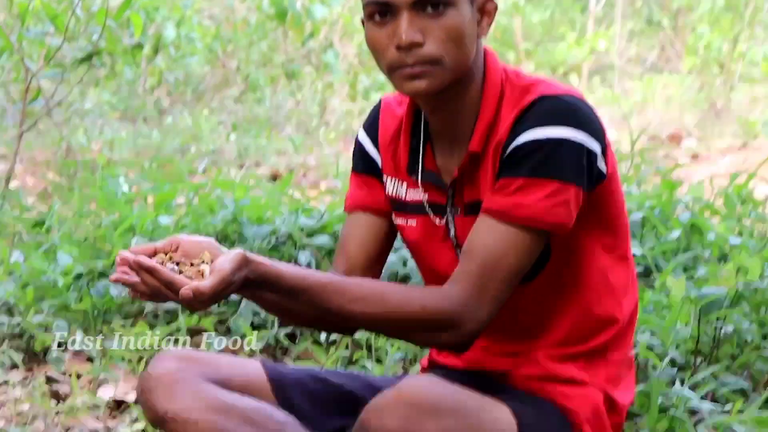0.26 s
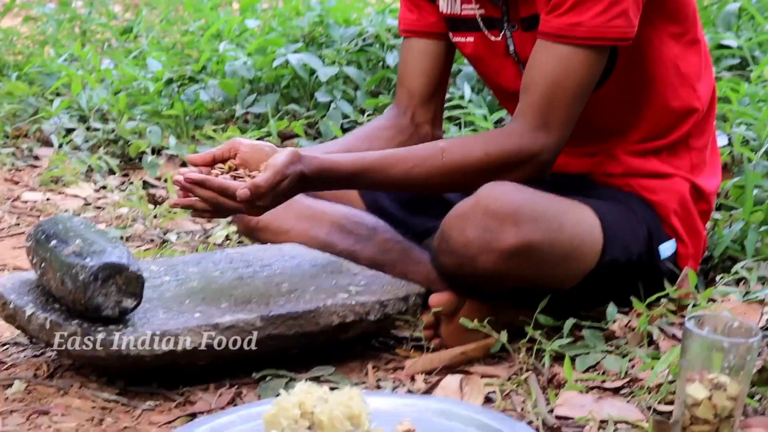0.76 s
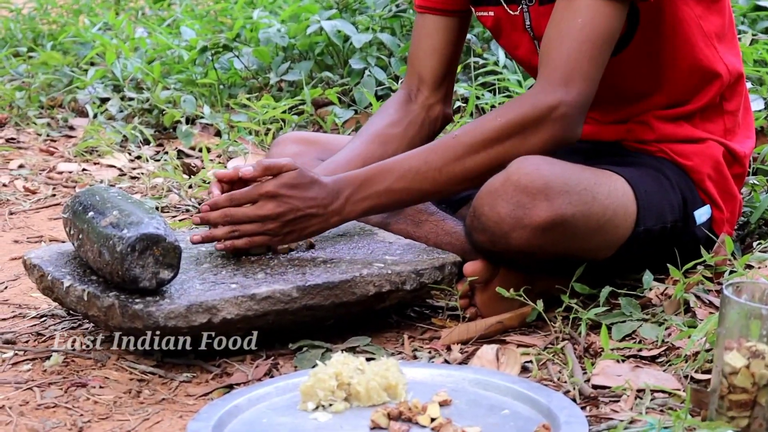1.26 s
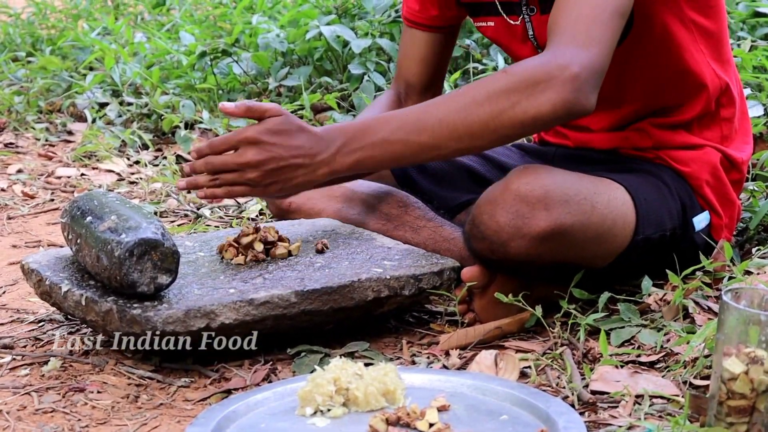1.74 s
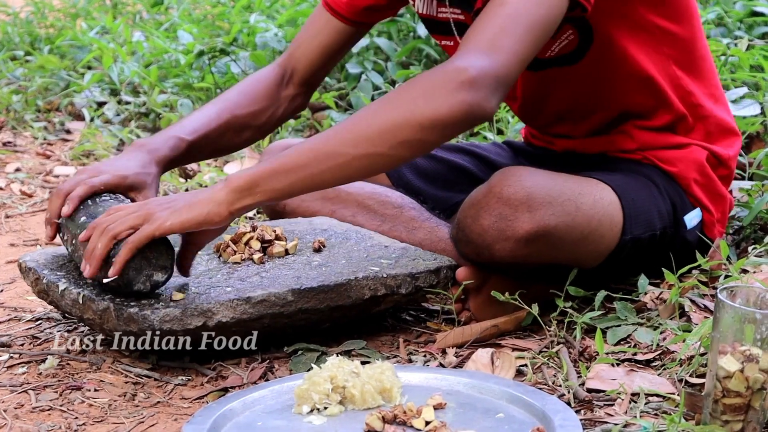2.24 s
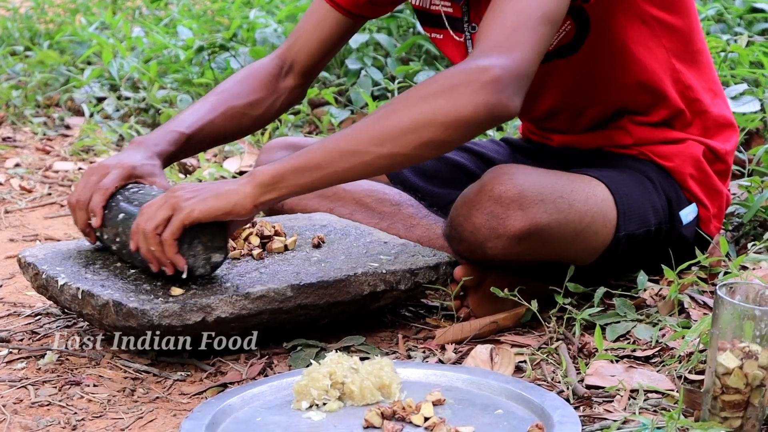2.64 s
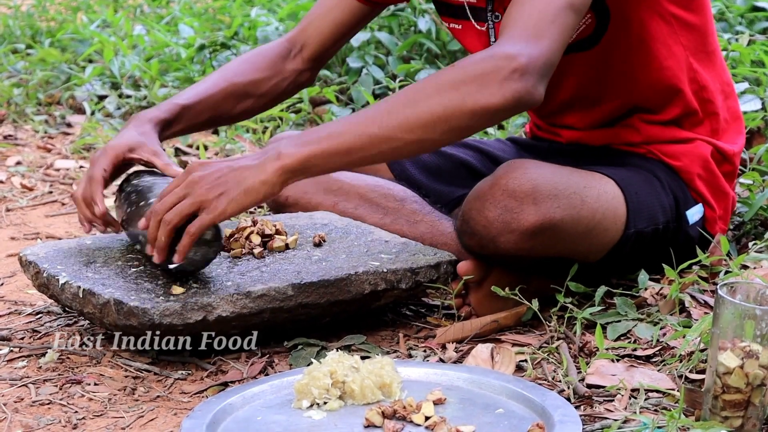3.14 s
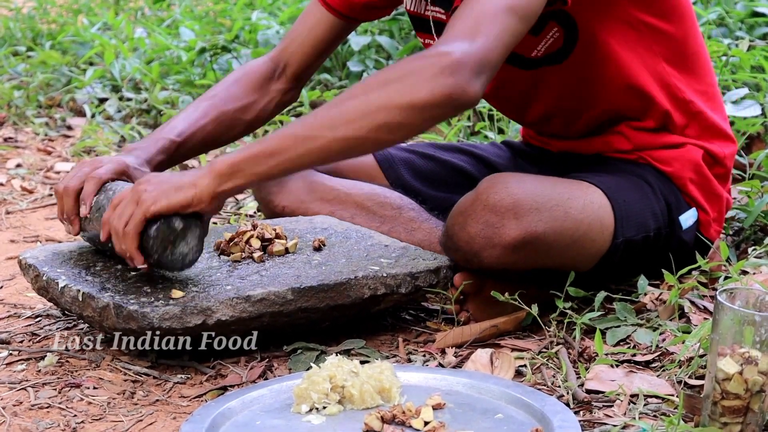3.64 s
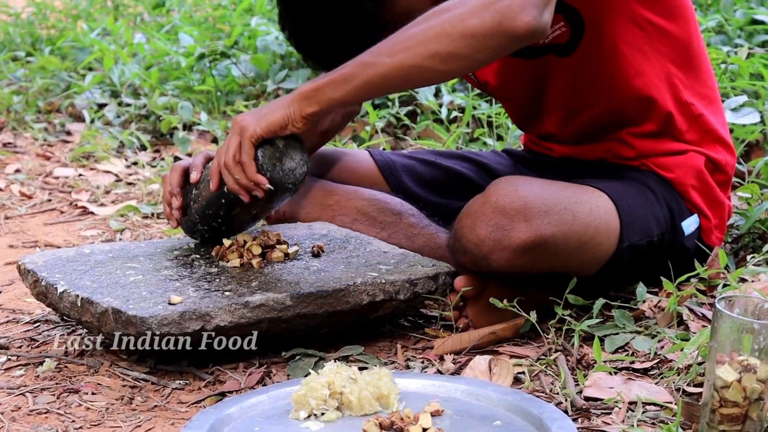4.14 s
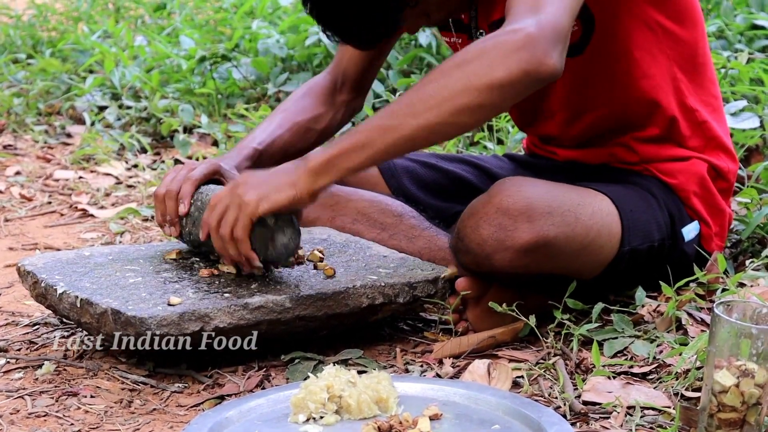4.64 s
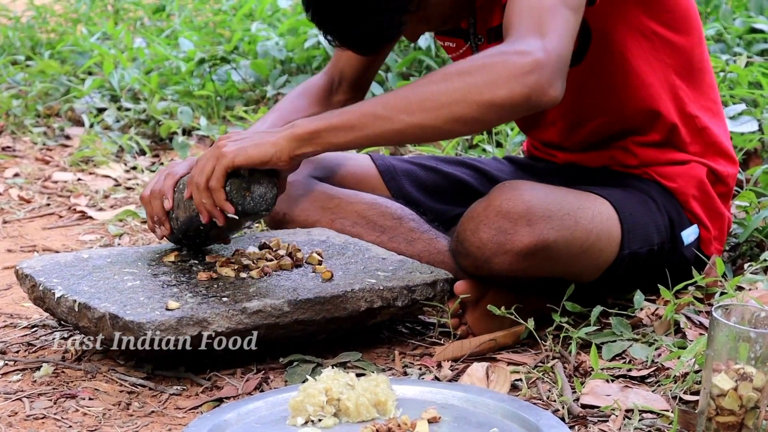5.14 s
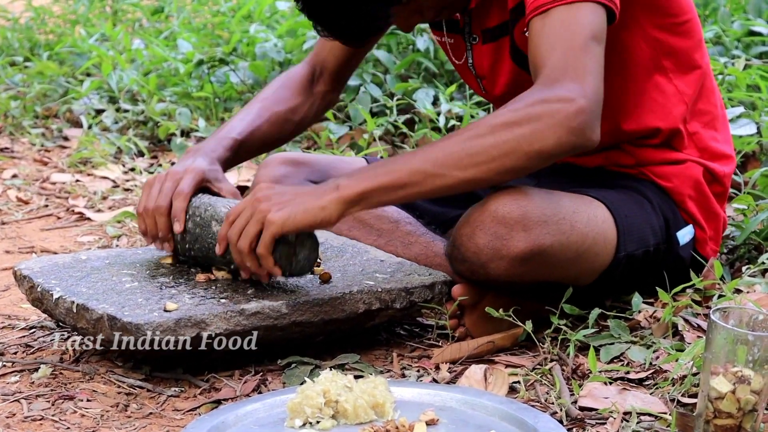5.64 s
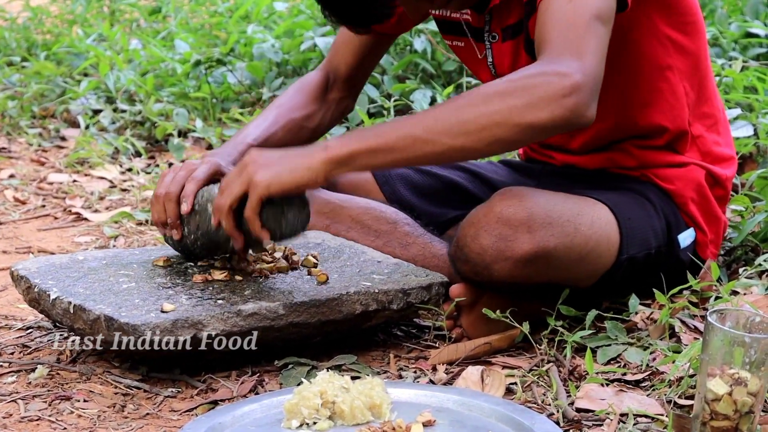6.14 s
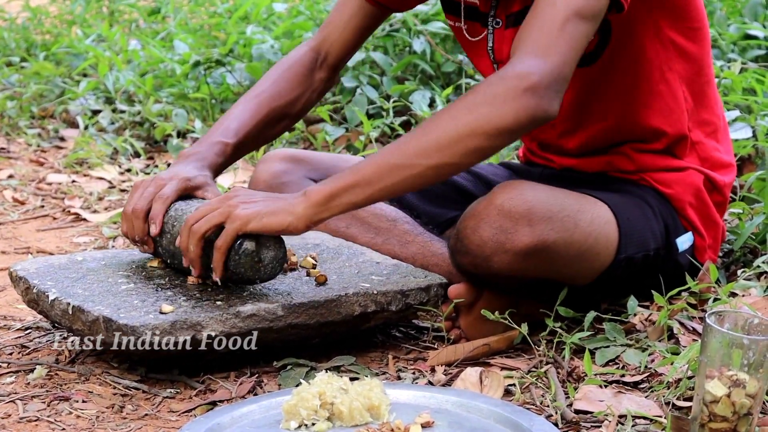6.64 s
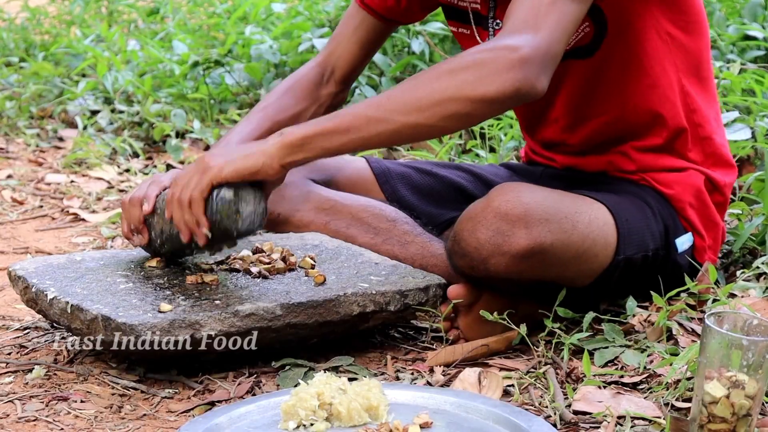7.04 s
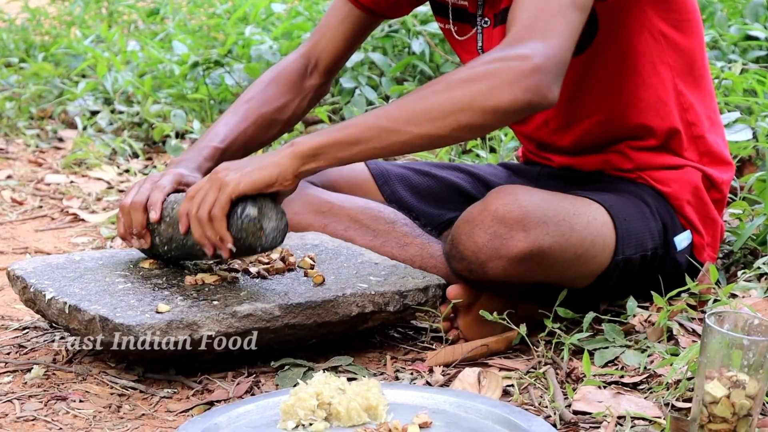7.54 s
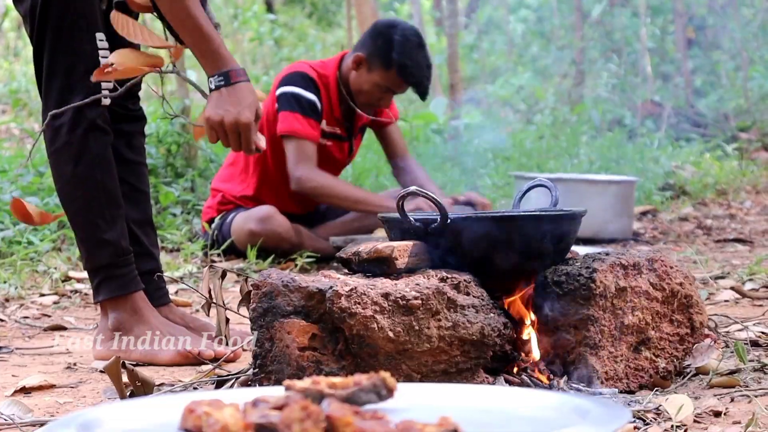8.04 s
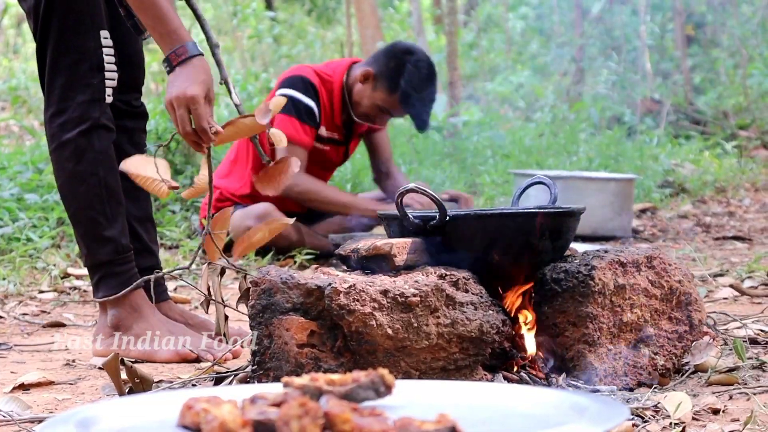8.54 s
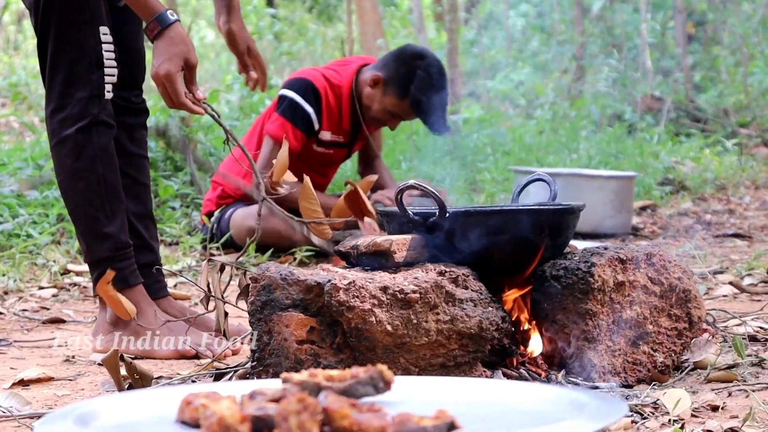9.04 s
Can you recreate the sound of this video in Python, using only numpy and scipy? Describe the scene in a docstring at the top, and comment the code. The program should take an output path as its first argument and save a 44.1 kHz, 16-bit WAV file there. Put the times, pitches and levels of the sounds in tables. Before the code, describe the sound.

Close to the microphone, dry seeds crackle softly before a stone pestle rumbles and rattles across a slab. Irregular blows follow, stone clacking on stone and crunching spices, with a slight echo from trees. High insects buzz all around throughout. The sound cuts out for a moment and returns beside a wood fire, with popping embers, dragged leaves and more distant hollow knocks.

```python
"""Outdoors, insects drone all round while seeds shift in the palms and dry husks snap.
From about 2.4 s a stone pestle rolls and chatters on a grinding slab. From 4 s it is knocked on dry spices:
each blow clacks, thuds into the ground, rings the pestle and echoes back from the trees.
Near 7.9 s the sound fades out briefly. It returns by a wood fire, where embers snap, a leafy branch
rustles and the pestle works farther off."""
import sys
import numpy as np
from scipy import signal
from scipy.fft import rfft, irfft, next_fast_len
from scipy.io import wavfile
from scipy.ndimage import uniform_filter1d, map_coordinates

SR = 44100
rng = np.random.default_rng(int(sys.argv[2]) if len(sys.argv) > 2 else 0)


def inscribe(sig):
    """Save sig as 16-bit PCM at rate SR to the path in sys.argv[1].

    A 1-D sig is mono; a 2-D sig holds one channel per row.
    Samples are clipped to [-1, 1] before scaling.
    """
    pcm = np.round(np.clip(np.atleast_2d(sig).T, -1, 1) * 32767)
    wavfile.write(sys.argv[1], SR, pcm.astype(np.int16))


N = 409248
FIRESIDE_S = 7.96  # when the sound returns by the fire


def pounding(clack_db=26, echo_db=-8, crush_db=4.5, spot_db=5, spot_octaves=0.13, pan_db=-1.5):
    """The pestle clacks, hops and crushes spice; the barer the stone, the more it rings."""
    # (time [s], clack level [dB], ring level [dB], top edge of the clack [Hz], tilt [dB per octave],
    #  resonance of the spot that is hit [Hz], hop delay [ms], hop level [dB])
    blows = [(4.046, -24.5, -28, 2330, -5, 1230, 13.7, -12),
             (4.521, -22.5, -22.5, 2630, 2, 1270, 11.3, -3.5), (4.836, -26.5, -45, 2140, 1, 1810, 9, -3),
             (5.1427, -21, -23.5, 2350, 3, 1810, 10.2, -5), (5.4539, -28.5, -53, 2250, 1.5, 1880, 5.8, -4),
             (5.774, -17.5, -19, 2870, 4, 1140, 5.5, -20), (5.7996, -23.5, -33, 2500, 5, 1090, 18, -5.5),
             (6.071, -15.5, -4.5, 3180, 7.5, 2780, 5.5, -16),
             (6.099, -24.5, -40, 2450, 3.5, 1900, 12.7, -2), (6.938, -30.5, -48, 2300, 2.5, 1360, 7, -3),
             (7.267, -19.5, -13, 2899, 4.5, 1350, 7.3, -10), (7.5544, -27, -27, 2710, 1.5, 1250, 19, -16),
             (7.853, -21.5, -13, 2790, 4.5, 1850, 10.6, -7), (9.185, -28.5, -30.5, 2460, 2, 1110, 8.7, -5)]
    # tone of stone on stone, and of the ground below: (frequency [Hz], level [dB])
    clack_tone = [(25, -54), (150, -8.5), (350, -6), (600, -2), (900, 2), (1200, 1), (1500, 0),
                  (1800, -0.5), (2400, -1)]
    thud_tone = [(20, -48), (40, -22), (90, -3), (150, 4.5), (260, -0.5), (500, -30.5), (1500, -81)]
    out = np.zeros((2, N))
    thud = impulse(lambda hz: along(thud_tone, hz))
    for s, hit_db, ring_db, edge_hz, tilt, spot_hz, hop_ms, hop_db in blows:
        spot = lambda hz: resonance(hz, spot_hz, spot_db, spot_octaves)
        cushion = lambda hz: tilt * np.log2((hz + 200) / 1500) - 10 * np.log10(1 + (hz / edge_hz) ** 22)
        click = impulse(lambda hz: along(clack_tone, hz) + spot(hz) + cushion(hz))
        paths = amp(echo_db) * tree_echo(width=0.36, rise_s=0.016)
        paths[:, 0] += 1  # the direct sound
        paths[:, round(0.0016 * SR)] += 0.35  # the clack bounces back off the ground
        paths[:, round(hop_ms * SR / 1000)] += amp(hop_db)  # the pestle hops once
        # a harder blow raises the thud and the crunch less than the clack
        contact = amp(hit_db + clack_db) * click * panned(pan_db) + amp(0.37 * hit_db) * thud
        crunch = amp(0.42 * hit_db + crush_db) * signal.fftconvolve(rattle(rate=400, t60=0.046), click)
        ring = panned(-3.5) * pestle_ring(hit_db, ring_db)
        ring_echo = signal.fftconvolve(tree_echo(width=0.62, rise_s=0.056), ring, axes=1)
        blow = np.zeros((2, N))
        add(blow, s, signal.fftconvolve(paths, contact, axes=1))
        add(blow, s, crunch * panned(pan_db))
        add(blow, s, ring)
        add(blow, s + 0.08, amp(-20) * ring_echo)
        if s < FIRESIDE_S:  # nothing rings on across the silence
            blow[:, round(FIRESIDE_S * SR):] = 0
        out += blow
    return out


def pestle_ring(hit_db, ring_db, main_hz=2752, main_t60=0.18, grip_hz=7, vary_db=3, lead_rad=0.77):
    """The struck pestle bends and rings: one main note that shifts with the grip, and three others."""
    # the other notes: (frequency [Hz], relative level [dB], time to fade by 60 dB [s])
    other_notes = [(1783, -13.5, 0.062), (2352, -8.5, 0.18), (4480, -19, 0.079)]
    t = np.arange(SR // 2) / SR
    phase = np.array([[lead_rad / 2], [-lead_rad / 2]])  # left runs ahead of right
    notes = [(hz, db + (hit_db + ring_db) / 2 + vary_db * rng.normal(), t60)
             for hz, db, t60 in other_notes]
    notes.append((main_hz + grip_hz * rng.normal(), ring_db, main_t60))
    attack = 1 - np.exp(-t / 0.00028)
    return attack * sum(amp(db - 60 * t / t60) * np.sin(2 * np.pi * hz * t + phase)
                        for hz, db, t60 in notes)


def nudging(level_db=27, echo_db=-8):
    """Tipped or nudged, the pestle chatters as it settles: the slab knocks hollowly, with no ring."""
    # (time [s], relative level [dB], top edge of the knock [Hz])
    nudges = [(2.396, -33, 774), (2.633, -36, 890), (2.642, -36, 785), (2.676, -31.5, 800),
              (2.683, -31, 800), (2.697, -30.5, 1000), (2.735, -36, 1000), (2.751, -29, 1050),
              (2.783, -37, 950), (2.809, -42, 905), (2.825, -40, 650), (2.842, -37.5, 700),
              (2.88, -43, 600), (2.908, -39, 650), (2.939, -40.5, 650), (2.99, -40, 545),
              (3.213, -39.5, 550), (3.246, -36, 490), (3.319, -34.5, 650), (3.696, -40.5, 646),
              (3.782, -34.5, 970), (3.87, -37.5, 1020), (4.415, -41, 595), (5.05, -40, 905),
              (5.342, -36, 910), (5.361, -37.5, 1000), (5.949, -40, 700), (6.229, -43, 1100),
              (6.304, -39, 1220), (6.646, -40, 1230), (7.06, -43, 1100), (7.216, -32.5, 1220),
              (7.506, -34, 1020), (8.07, -36.5, 1200), (8.183, -33.5, 1700), (8.304, -31, 1200),
              (8.375, -33.5, 1500), (8.456, -42, 700), (8.603, -41.5, 550), (8.644, -38.5, 920),
              (8.683, -39, 1200), (8.771, -40.5, 1504), (8.842, -39.5, 650), (8.891, -35.5, 1000),
              (8.994, -40, 796), (9.127, -35.5, 880), (9.269, -36, 1500)]
    # tone of the slab: (frequency [Hz], level [dB])
    slab_tone = [(88, -28), (150, -1.5), (286, 0.5), (544, 0), (867, 3), (943, 1.5), (1200, 3.5),
                 (1500, -1.5), (1770, -2.5), (2250, -1.5), (2340, 8), (2450, -1), (2600, 1.5), (3380, -34),
                 (5720, -120)]
    out = np.zeros((2, N))
    hollow = lambda hz: resonance(hz, centre_hz=520, height_db=7, octaves=0.14)
    for s, db, edge_hz in nudges:
        treble_cut = lambda hz: 16 * np.log10(1 + (hz / edge_hz) ** 3)
        click = impulse(lambda hz: along(slab_tone, hz) + hollow(hz) - treble_cut(hz))
        chatter = amp(echo_db) * tree_echo(width=0.15) + rattle(rate=1800, t60=0.036)
        add(out, s, amp(db + level_db) * signal.fftconvolve(chatter, click[None], axes=1))
    return out


def rolling(uneven_db=3.5):
    """Pits in the rolling pestle tap the slab and keep the pestle faintly ringing."""
    # (loudest moment [s], rise [s], fall [s], level [dB], ring level against the grinding [dB])
    rolls = [(2.7, 0.12, 0.25, -31, -10), (2.93, .15, 0.16, -58, -20.5), (3.82, 0.062, 0.19, -47, 2),
             (8.09, 0.054, 0.15, -38.5, -12), (8.31, 0.034, 0.3, -41.5, -6),
             (8.68, 0.063, 0.21, -41.5, -10), (9.22, 0.06, 0.34, -36, -5)]
    # tone of the grinding: (frequency [Hz], level [dB])
    grind_tone = [(59, -26), (100, -1.5), (190, -7.5), (330, -6), (420, -25), (560, 3), (752, -8.5),
                  (890, -18), (1110, -5.5), (1570, -22.5), (2200, -27), (2860, -63), (4840, -120)]
    taps = grains(rate=900, scatter_db=3.5)
    grind = unit(spread(taps, grind_tone) * amp(uneven_db * wobble(55)))
    two_notes = lambda hz: 1 / (1 + 1j * (hz - 2385) / 8) + 0.53 / (1 + 1j * (hz - 2760) / 8)
    ring = unit(filtered(taps[0], two_notes))
    return sum(amp(db) * swell(s, rise, fall) * (grind + amp(ring_db) * ring)
               for s, rise, fall, db, ring_db in rolls)


def farther(x):
    """Heard from the fireside, the work on the slab sounds hollow."""
    # that hollow tone: (frequency [Hz], level [dB])
    hollow_tone = [(80, -7), (160, 7), (230, -3.5), (330, 2.5), (410, -6), (506, 4.5), (620, -8.5),
                   (748, 1.5), (880, -5.5), (1100, -1), (3000, 0.5)]
    click = impulse(lambda hz: along(hollow_tone, hz))
    hollow = signal.fftconvolve(x, click[None], axes=1)[:, :N]
    return np.where(np.arange(N) / SR < FIRESIDE_S, x, hollow)


def snapping(crack_db=-9, body_db=29, crack_t60=0.035, body_t60=0.039):
    """Dry husks, twigs and embers break with a bright crack over a brief ring at their own pitch."""
    # (time [s], crack level [dB], body level [dB], pitch of the body [Hz])
    snaps = [(0.411, -23.5, -43.5, 3220), (0.735, -22, -42.5, 3470), (0.837, -24.5, -43, 3320),
             (0.859, -35.5, -41, 3700), (1.011, -30, -60, 3500), (1.211, -26, -57, 3500),
             (1.243, -38, -47, 3800), (1.26, -43, -49, 3580), (1.298, -28, -49.5, 3900),
             (1.384, -38, -51, 3540), (3.518, -24, -39.5, 3600), (4.606, -38, -39, 3830),
             (4.867, -39.5, -36.5, 3300), (4.933, -40, -38.5, 3730), (5.381, -25, -40, 3580),
             (6.0703, -22, -25, 3030), (6.937, -26, -44, 4000), (7.227, -24.5, -37.5, 3600),
             (7.2659, -23.5, -31, 3150), (7.515, -20.5, -42.5, 3370), (7.807, -21, -40, 3500),
             (8.211, -18.5, -39, 2920), (8.233, -23.5, -39, 2600), (8.291, -21, -39, 2920),
             (8.315, -20.5, -39, 3000), (8.34, -32, -38.5, 2430), (8.374, -29, -36.5, 3370),
             (8.447, -30, -30.5, 2920), (8.525, -41.5, -44, 3000), (8.799, -41, -40, 2900),
             (8.901, -32, -44, 3400), (8.927, -44.5, -45.5, 3470), (8.961, -47, -42, 2770),
             (9.083, -32, -41.5, 4130), (9.168, -35, -47, 3160), (9.24, -26, -33.5, 3030)]
    # tone of the crack, and of the body that breaks: (frequency [Hz], level [dB])
    crack_tone = [(800, -25), (2500, -10.5), (4000, -1), (8000, 8), (15000, 4)]
    body_tone = [(100, -10), (500, 6.5), (1500, 3.5), (4000, -3), (5000, 3.5), (8000, -15.5)]
    bodies, crack_gain = np.zeros((2, N)), np.zeros(N)
    t = np.arange(SR // 10) / SR
    for s, crack, body, pitch_hz in snaps:
        add(crack_gain, s, amp(crack + crack_db - 60 * t / crack_t60))
        click = impulse(lambda hz: along(body_tone, hz)
                        + resonance(hz, pitch_hz, height_db=20, octaves=0.24))
        fracture = rattle(rate=1700, t60=body_t60) + amp(-10.5) * tree_echo(width=1.0)
        add(bodies, s, amp(body + body_db) * signal.fftconvolve(fracture, click[None], axes=1))
    return bodies + crack_gain * spread(grains(rate=5300, scatter_db=6.5), crack_tone)


def bumping(level_db=19.5, echo_db=-12, thump_hz=340, low_hz=45):
    """Hands, limbs and the slab bump the soil with no ring; the heavier they are, the lower it sounds."""
    # (time [s], relative level [dB], centre pitch [Hz])
    bumps = [(0.7342, -20, 343), (5.384, -31, 109), (5.774, -20, 200), (7.236, -34, 99),
             (7.521, -29.5, 126), (7.821, -32.5, 70), (9.188, -28.5, 195)]
    # tone of a bump centred on thump_hz: (frequency [Hz], level [dB])
    thump_tone = [(29, -40), (50, -18), (334, 0.5), (582, -7), (878, -15.5), (1060, -11.5), (1500, -22),
                  (2200, -30), (2860, -50), (4840, -120)]
    out = np.zeros((2, N))
    bass_cut = lambda hz: 20 * np.log10(1 + (low_hz / (hz + 1)) ** 2)
    for s, db, centre_hz in bumps:
        push = impulse(lambda hz: along(thump_tone, hz * thump_hz / centre_hz) - bass_cut(hz))
        paths = amp(echo_db) * tree_echo(width=0.26)
        paths[:, 0] += 1  # the direct sound
        add(out, s, amp(db + level_db) * signal.fftconvolve(paths, push[None], axes=1))
    return out


def rustling(tick_db=-55, pan_db=-2):
    """Seeds in the palms, then dragged leaves, crackle in clumps; leaf litter ticks faintly throughout."""
    # (loudest moment [s], rise [s], fall [s], level [dB])
    rustles = [(0.48, 0.11, 0.04, -43), (1.27, 0.12, .25, -65), (8.241, 0.39, 0.36, -35),
               (8.85, 0.45, 0.64, -51.5), (9.26, 0.11, 0.33, -33.5)]
    # tone of the crackle, and of the ticks: (frequency [Hz], level [dB])
    leaf_tone = [(530, -36), (900, -3.5), (1430, -0.5), (1580, 0.5), (2330, 2), (4130, -9), (5000, 4),
                 (6730, -16), (15500, -11)]
    tick_tone = [(1500, -16), (3000, -8), (3800, -2.0), (4400, -6), (8000, -51)]
    motion = sum(amp(db) * swell(s, rise, fall) for s, rise, fall, db in rustles)
    crackle = spread(grains(rate=4800, scatter_db=5.0), leaf_tone)
    clumps = unit(crackle * amp(2.8 * wobble(60)))
    ticks = spread(grains(rate=44, scatter_db=4.5), tick_tone)
    return motion * clumps * panned(pan_db) + amp(tick_db) * ticks


def insects_and_air(insect_db=-33.5, overtone_db=-17, air_db=-44, lead_s=0.00015):
    """Many insects merge into one shrill band with overtones, above a low stir of air."""
    # tone of the insects, their overtones and the air: (frequency [Hz], level [dB])
    insect_tone = [(2350, -54), (4000, -37), (4330, -20), (4650, -3.5), (4990, -0.5), (5230, -2),
                   (5670, -9), (6100, -8), (6310, -13), (6670, -22), (7250, -19), (7800, -26), (10100, -51),
                   (17200, -120)]
    overtones = [(4410, -39.5), (7500, -16.5), (7990, -1.5), (9390, 3.5), (11300, -9), (13600, -11.5),
                 (14600, -8.5), (15500, -17)]
    air_tone = [(15, -60.5), (25, -24.5), (87, -0.5), (125, -2), (165, -2.5), (220, -6), (320, -4.5),
                (462, -11), (694, -9), (936, -13.5), (1110, -9.5), (1320, -16), (1570, -14.5), (1710, -12),
                (4200, -6), (5460, -43.5), (9240, -120)]
    chorus = rush(insect_tone, patchy_db=1.15) + amp(overtone_db) * rush(overtones, patchy_db=2.5)
    insects = amp(insect_db + 0.088 * wobble(12)) * chorus
    air = amp(air_db + 0.54 * wobble(9)) * rush(air_tone, patchy_db=2.5)
    left_first = lambda hz: np.exp(1j * np.pi * hz * lead_s * np.array([[1], [-1]]))
    by_slab = filtered(insects + air, left_first)
    by_fire = amp(-1.5) * (insects * panned(-1.5) + air)  # weaker, with the insects to the right
    opening = amp(-5.5 * (1 - ramp(0, 0.53)))  # starts low and comes up
    return np.where(np.arange(N) / SR < FIRESIDE_S, opening * by_slab, by_fire)


def tree_echo(width, rise_s=0.00079):
    """Ground and trees scatter a sound back: a stereo echo that builds up over rise_s."""
    # (frequency [Hz], time to fade by 60 dB [s])
    fade_times = [(100, 0.12), (400, 0.21), (1200, 0.27), (2400, 0.23), (3200, 0.08), (5000, 0.12),
                  (15000, 0.13)]
    size = SR // 2
    hz, t, noise = signal.stft(rng.standard_normal((2, size)), SR, nperseg=256)
    decay = amp(-60 * t / along(fade_times, hz)[:, None])
    mid, side = signal.istft(noise * decay, SR, nperseg=256)[1][:, :size]
    build_up = 1 - np.exp(-(np.arange(size) / SR / rise_s) ** 2)
    tail = np.array([mid + width * side, mid - width * side]) * build_up
    return tail / np.linalg.norm(tail[0])


def spread(pair, tone):
    """Give two unrelated signals a tone and blend them to left and right: bass alike, treble not."""
    # (frequency [Hz], how alike left and right are [0 to 1])
    likeness = [(100, 0.98), (500, 0.9), (1500, 0.56), (3000, 0.41), (5000, 0.22), (9000, 0.033),
                (15000, 0.1)]
    turn = lambda hz: np.arccos(along(likeness, hz)) / 2
    mid, side = filtered(pair, lambda hz: amp(along(tone, hz)) * [np.cos(turn(hz)), np.sin(turn(hz))])
    return unit(np.array([mid + side, mid - side]))


def rush(tone, patchy_db):
    """Stereo noise with drifting louder and softer patches."""
    noise = signal.stft(rng.standard_normal((2, N)), nperseg=1024)[2]
    patches = uniform_filter1d(rng.standard_normal(noise.shape[1:]), size=5, axis=0)  # smooth in pitch
    patches = uniform_filter1d(patches, size=10, axis=1)  # and in time
    patchy = signal.istft(noise * amp(patchy_db * unit(patches)), nperseg=1024)[1][:, :N]
    return spread(patchy, tone)


def rattle(rate, t60):
    """A run of small taps, rate a second, that fades by 60 dB in t60 seconds."""
    t = np.arange(SR // 2) / SR
    taps = rng.standard_normal(len(t)) * (rng.random(len(t)) < rate / SR) * amp(-60 * t / t60)
    return taps / (np.linalg.norm(taps) + 1e-9)


def grains(rate, scatter_db):
    """Two rows of tiny random taps of uneven size, rate a second."""
    sizes = amp(scatter_db * np.clip(rng.standard_normal((2, N)), -2, 2)) * rng.choice([-1, 1], (2, N))
    return unit(sizes * (rng.random((2, N)) < rate / SR))


def impulse(level_db, size=4096):
    """A click of energy 1 whose tone follows level_db(frequency)."""
    cepstrum = irfft(np.log(amp(level_db(np.fft.rfftfreq(size, 1 / SR))) + 1e-6))
    cepstrum[1:size // 2] *= 2  # folding this way packs the energy at the click's start
    cepstrum[size // 2 + 1:] = 0
    click = irfft(np.exp(rfft(cepstrum)))
    return click / np.linalg.norm(click)


def resonance(hz, centre_hz, height_db, octaves):
    """A boost in dB around centre_hz, half as high that many octaves away."""
    return height_db / (1 + (np.log2((hz + 1) / centre_hz) / octaves) ** 2)


def filtered(x, response):
    """Scale each frequency of x by response(frequency)."""
    size = next_fast_len(x.shape[-1] + 8192)
    return irfft(rfft(x, size) * response(np.fft.rfftfreq(size, 1 / SR)), size)[..., :x.shape[-1]]


def swell(s, rise_s, fall_s):
    """Gain of one movement: it climbs 20 dB in rise_s, peaks at s and loses as much in fall_s."""
    t = np.arange(N) / SR - s
    return amp(-20 * np.maximum(-t / rise_s, t / fall_s))


def ramp(start_s, end_s):
    """Rises from 0 to 1 between two times."""
    return np.clip((np.arange(N) / SR - start_s) / (end_s - start_s), 0, 1)


def wobble(rate):
    """A smooth curve through rate random points a second."""
    return map_coordinates(rng.standard_normal(int(N * rate / SR) + 4), [np.arange(N) * rate / SR])


def along(points, hz):
    """Read between (frequency, value) points on a log frequency axis."""
    freqs, values = np.transpose(points)
    return np.interp(np.log(hz + 1), np.log(freqs + 1), values)


def add(track, s, sound):
    """Mix a sound into the track at time s."""
    start = round(s * SR)
    track[..., start:start + sound.shape[-1]] += sound[..., :max(N - start, 0)]


def panned(pan_db):
    """Left and right gains; below zero, the right is louder."""
    return amp([[pan_db / 2], [-pan_db / 2]])


def amp(db):
    """Decibels to gain."""
    return 10 ** (np.asarray(db) / 20)


def unit(x):
    """Scale to an average (rms) level of 1."""
    return x / np.sqrt(np.mean(x ** 2) + 1e-20)


def limiter(x, limit_db=-14.5, release_db_per_s=24):
    """The loudest blows pull the level down at once; it recovers at a steady rate."""
    power = np.abs(uniform_filter1d(np.mean(x ** 2, axis=0), size=882))  # averaged over 20 ms
    over_db = np.maximum(10 * np.log10(power + 1e-20) - limit_db, 0)
    recovery_db = release_db_per_s * np.arange(N) / SR
    return x * amp(recovery_db - np.maximum.accumulate(over_db + recovery_db))


def scene():
    """All sources together."""
    slab_work = farther(pounding() + nudging() + rolling())
    return slab_work + bumping() + snapping() + rustling() + insects_and_air()


def record(dry, ceiling=0.92, top_hz=15700):
    """Limit the level, round off the peaks, fade briefly to silence and cut the highest treble."""
    limited = limiter(dry)
    rounded = limited / (1 + np.abs(limited / ceiling) ** 10) ** (1 / 10)
    fade = 1 - ramp(7.865, 7.895) + ramp(FIRESIDE_S, 8.05) ** 1.8
    return filtered(rounded * fade, lambda hz: hz < top_hz)


dry = scene()
out = record(dry)
inscribe(out)
```